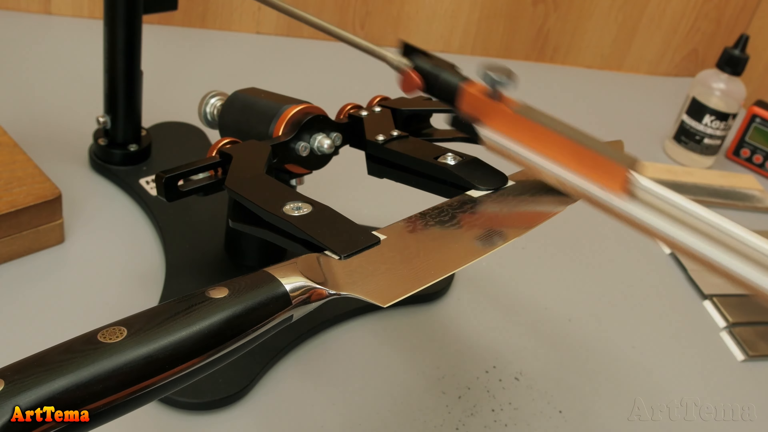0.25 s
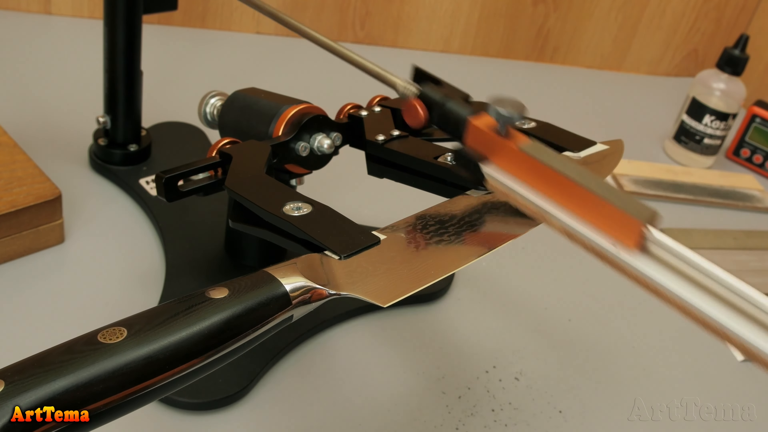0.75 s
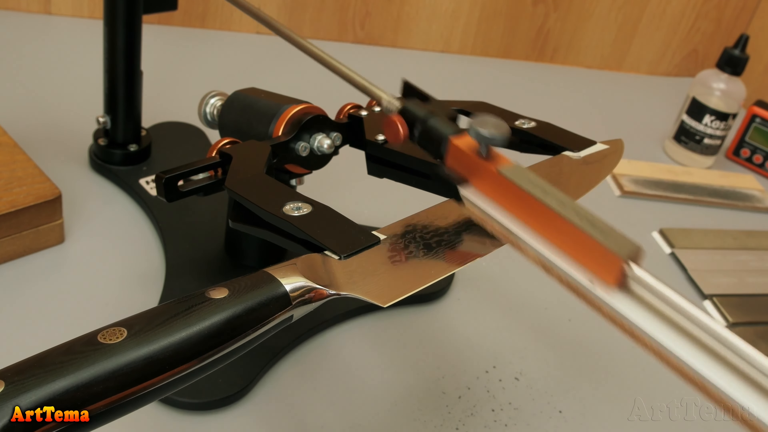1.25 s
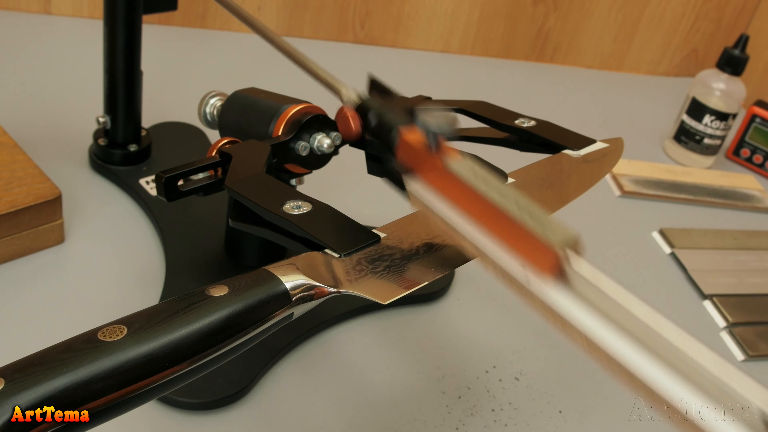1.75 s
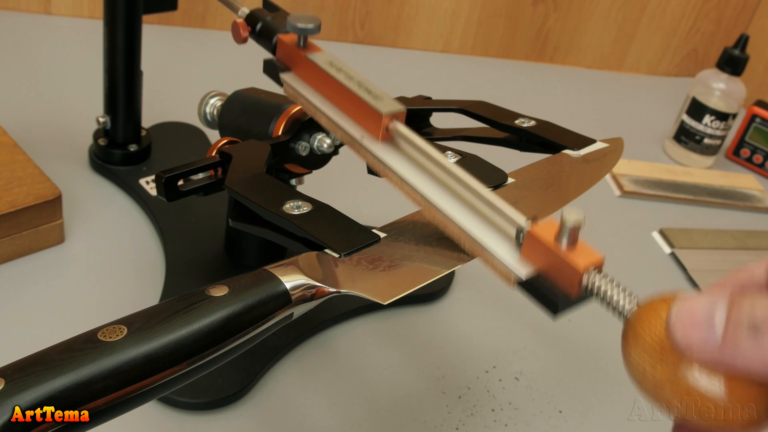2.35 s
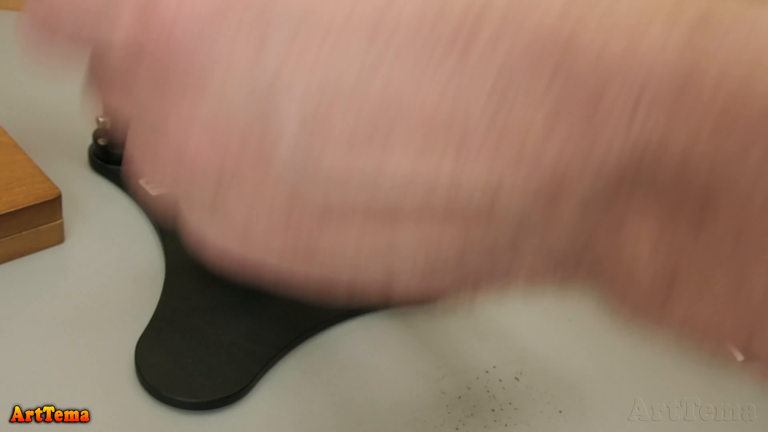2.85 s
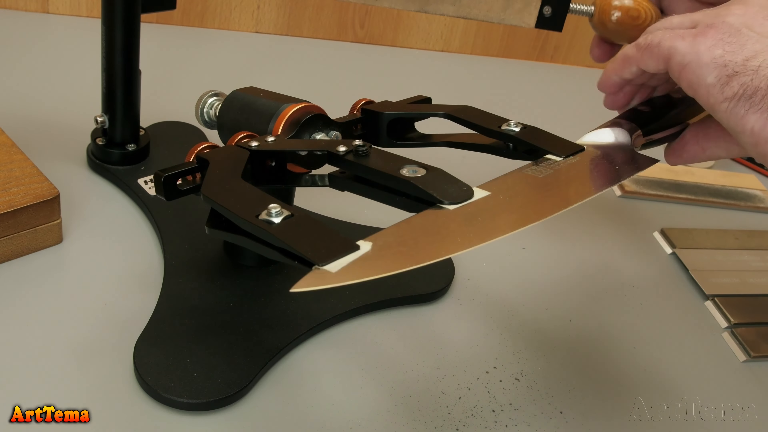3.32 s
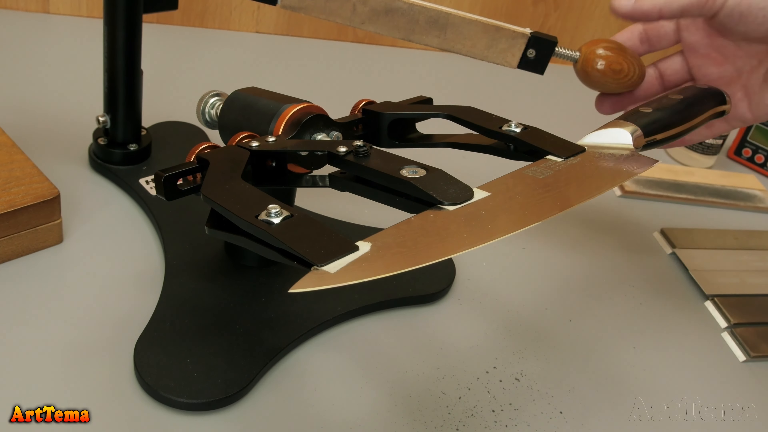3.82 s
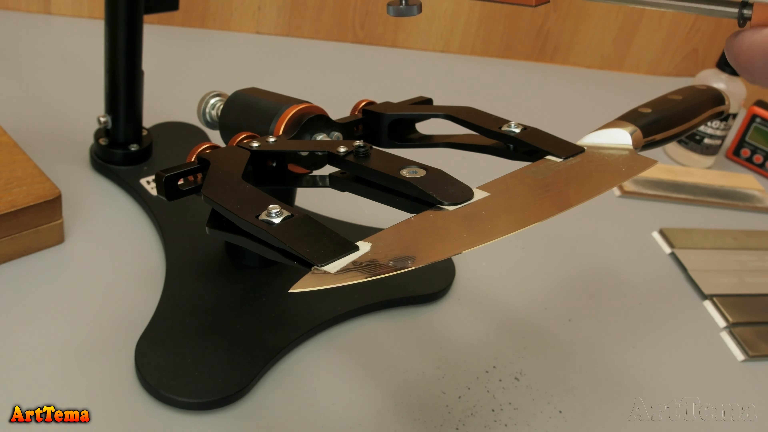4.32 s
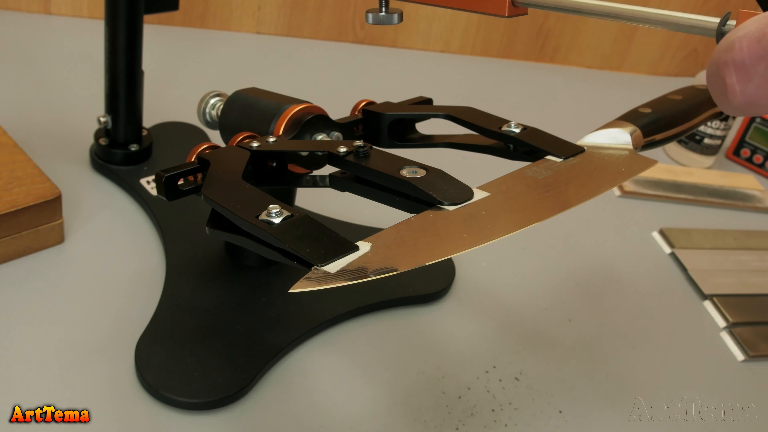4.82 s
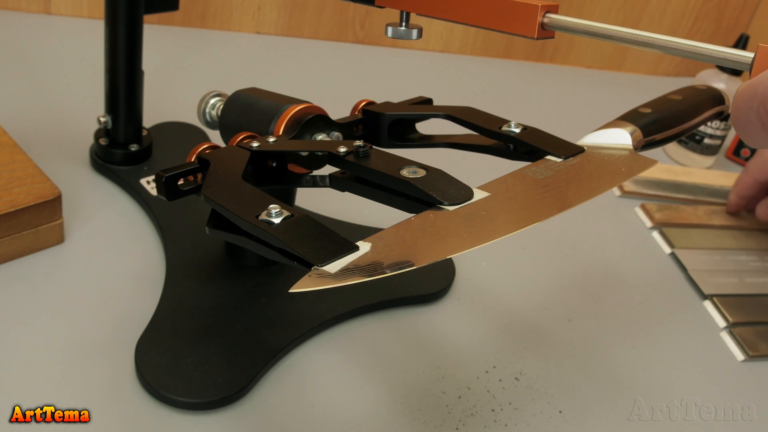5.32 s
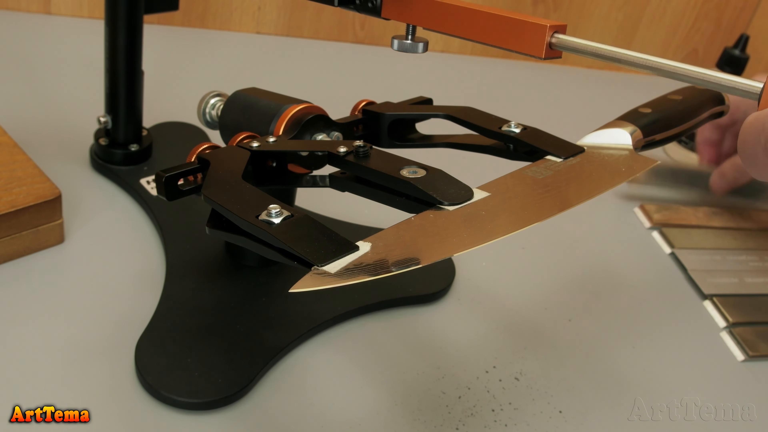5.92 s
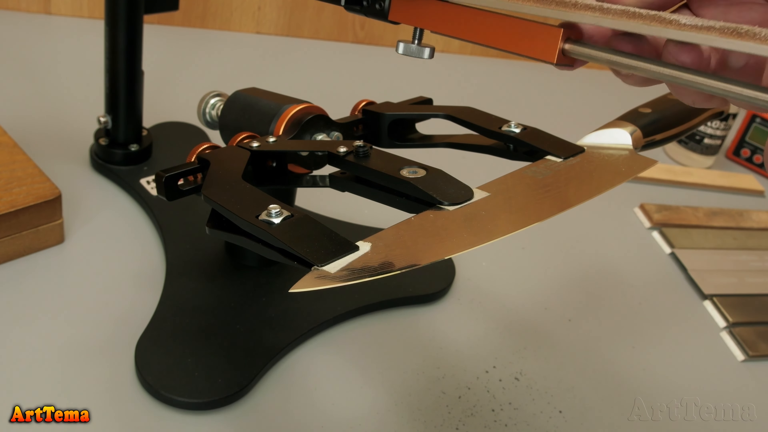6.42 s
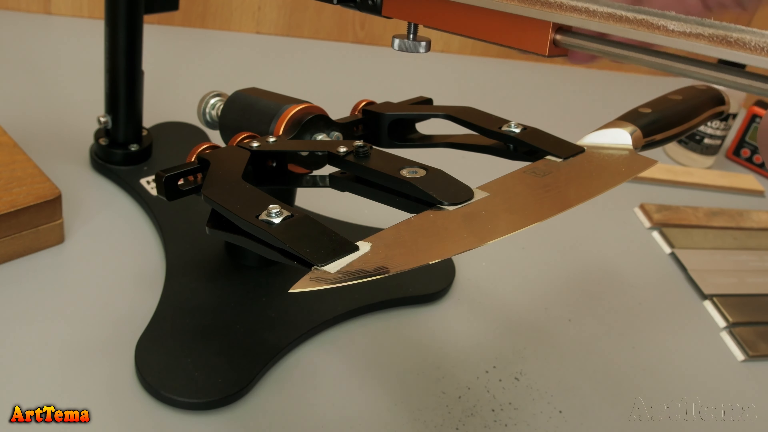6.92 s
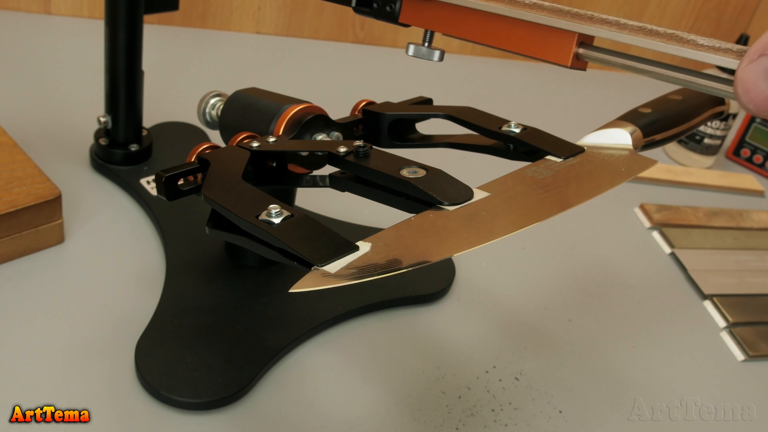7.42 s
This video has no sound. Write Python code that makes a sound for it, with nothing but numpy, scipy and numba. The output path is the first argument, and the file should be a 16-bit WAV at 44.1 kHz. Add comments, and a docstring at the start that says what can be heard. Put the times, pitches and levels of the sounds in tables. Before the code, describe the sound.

On a bench in a small quiet room, a stone on a guide rod strokes a clamped knife, dull pulls alternating with brighter, hissing pushes, each turn softly thumping the bench. Near three seconds it stops; the clamp flips over with a heavy double thud. Small clinks and slides follow, then loud sharp clacks as the stone is swapped, and a few lighter knocks. Close stereo microphone on the bench, faint room air.

```python
"""On a bench in a small quiet room, a stone on a guide rod is stroked to and fro along a clamped knife.
Grit makes the hiss; each turn of the rod thumps the bench, which rings at its own low pitches.
Then the clamp is flipped over and the stone is swapped: bursts of tiny contacts make clacks and slides.
A close stereo microphone on the same bench hears it through gain control, over faint room air."""
import sys
import numpy as np
from scipy import signal
from scipy.fft import rfft, irfft, next_fast_len
from scipy.io import wavfile
from scipy.ndimage import uniform_filter1d
from numba import njit

SR = 44100
rng = np.random.default_rng(int(sys.argv[2]) if len(sys.argv) > 2 else 0)


def inscribe(sig):
    """Save sig as 16-bit PCM at rate SR to the path in sys.argv[1].

    A 1-D sig is mono; a 2-D sig holds one channel per row.
    Samples are clipped to [-1, 1] before scaling.
    """
    pcm = np.round(np.clip(np.atleast_2d(sig).T, -1, 1) * 32767)
    wavfile.write(sys.argv[1], SR, pcm.astype(np.int16))


N = 338247  # length of the scene [samples]

# "Ring time" and "fade time" are the time to drop by 60 dB. Levels are set ahead of the gain control.
# Room air and microphone hiss: (frequency [Hz], loudness against the other rows [dB])
AIR_COLOUR = [(15, -36.5), (25, -10), (141, 2), (624, -13.5), (911, -21), (1100, -47.5), (1840, -27.5),
              (2990, -31), (3340, -32), (4610, -38), (6210, -39), (12200, -41), (16000, -43)]
# The stone on the blade, a dull pull and a bright push by turns: (fastest moment [s],
#   speeding up [s], slowing down [s], hiss gain [dB], treble gain [dB], drag felt in the bench, gain [dB])
STONE_STROKES = [(.02, .12, 0.15, -75, -75, -72), (.37, 0.16, 0.091, -61, -55, -52.5),
                 (.55, 0.15, .14, -70.5, -74.5, -57), (.81, 0.11, 0.12, -66, -57.5, -53.5),
                 (1.02, 0.072, 0.13, -68, -73, -85), (1.3, 0.13, 0.13, -62.5, -55.5, -52.5),
                 (1.5, 0.084, 0.14, -68, -74, -75), (1.769, .14, 0.072, -59.5, -53.5, -58),
                 (1.92, 0.087, 0.13, -70, -78, -79), (2.17, .1, .12, -58.5, -53.5, -54.5),
                 (2.36, 0.076, 0.13, -70, -81, -75), (2.58, 0.15, 0.087, -69.5, -60, -53),
                 (2.81, 0.092, 0.15, -71, -83, -65)]
# Faint rubbing of rod and hands throughout: (time [s], hiss gain [dB], treble gain [dB],
#   drag felt in the bench, gain [dB], shake of the stand, gain [dB])
FAINT_HANDLING = [(0, -80, -86.5, -65.5, -70.5), (2.9, -79.5, -82.5, -68.5, -73),
                  (3.14, -75, -79.5, -59, -56.5), (3.32, -72, -79, -62, -71), (3.48, -68, -68.5, -48, -64),
                  (3.65, -65, -75, -72, -68), (3.83, -75, -80, -65.5, -66.5),
                  (4.85, -74.5, -79.5, -63.5, -78.5), (5.3, -74.5, -80.5, -68.5, -75),
                  (5.44, -77.5, -87, -79.5, -80.5), (5.68, -88, -86, -74, -80.5),
                  (5.8, -74.5, -78, -71, -70), (6.01, -69.5, -65.5, -64.5, -69.5),
                  (6.4, -76, -81, -65.5, -76.5), (6.62, -65.5, -73.5, -64, -67.5),
                  (6.89, -77.5, -77, -68, -77), (7.67, -76.5, -81.5, -63, -78)]
# Pitches of the bench top: (frequency [Hz], level [dB], ring time when left free [s])
BENCH_MODES = [(36, -19, 0.14), (70, -6, 0.16), (103, -10.5, 0.19), (125.8, 4.5, .12), (158, -3, 0.13),
               (198, 2.5, .07), (271.6, -0.5, 0.15), (326, -2, 0.14), (384.4, 0.5, 0.13), (545, -14, 0.091),
               (578.6, -12.5, 0.14), (709.6, -12, 0.24), (850, -48.5, .05), (1400, -29.5, .04)]
# Pitches of rod, stone holder and blade: (frequency [Hz], level [dB], ring time when left free [s])
STEEL_MODES = [(1561, -2.5, 0.022), (1950, 6, 0.017), (2290, 6, 0.013), (2810, 7.5, 0.01),
               (3401, 7.5, 0.03), (3614, 1.5, 0.058), (3940, -2, 0.037), (4200, -5.5, 0.015),
               (4780, -1, .04), (4990, -1.5, 0.06), (5660, 2, 0.022), (6340, 0.5, 0.045), (6850, -5.5, .04),
               (6660, -10.5, 0.027), (8800, -12, .03), (10710, -7.5, .03)]
# Blows into the bench: (time [s], level of the low boom [dB], length of the push [ms],
#   knock of the first touch against the boom [dB], size of the rebound [share of the push])
BENCH_BLOWS = [(.075, -49, 5.7, -33, 0.57), (.202, -24.5, 1.7, -31, .99), (.427, -5, 2.2, -17.5, 0.45),
               (.669, -26, 4.8, -15.5, 1), (.849, -42.5, 1.3, -30, 0.69), (.923, -44.5, 4.8, -33, 0.87),
               (1.169, -22, 1.3, -22, 0.88), (1.358, -26.5, 4.8, -22, 0.89), (1.588, -28, 3.3, -36, .96),
               (1.657, -40, 5.6, -27, 0.62), (2.054, -21, 1.3, -20, 0.75), (2.282, -47, 2.7, -18, 1),
               (2.473, -24.5, 3.8, -8, 0.57), (2.59, -41.5, 4.5, -16, .9), (2.803, -38, 4.9, -33, .99),
               (2.878, -43, 6.1, -23, 0.74), (2.988, -41.5, 4.9, -31, 0.9), (3.095, -23, 3.8, -11.5, 0.86),
               (3.359, -13.5, 2.6, -8.5, 0.94), (3.37, -8.5, 2.5, -16, .99), (3.508, -30.5, 7.3, -38, 0.47),
               (3.55, -25.5, 5.4, -18, 0.92), (3.982, -46, 3.1, -8.5, .99), (4.096, -49.5, 5.8, -13, .9),
               (4.289, -47.5, 6.8, -16, 0.87), (4.398, -42, 4.8, -34, .96), (4.67, -45, 5.4, -6.5, .99),
               (5.24, -21.5, 5.5, 10, .41), (5.306, -23.5, 4, 15, 0.38), (5.712, -33.5, 1.6, -21.5, .46),
               (5.729, -40.5, 1.6, -21, 0.89), (5.974, -33, 8.3, -6, .67), (6.405, -39.5, 4.3, -4.5, 0.85),
               (6.724, -38.5, 4.3, 12.5, 0.63)]
# The rod ticks on its stop, the clamp seats, stone bars knock on wood and metal:
#   (time [s], level ahead of a shared 10.5 dB cut [dB], centre [Hz], knock under it [dB],
#   treble [dB], ring pitch [Hz], ring level [dB], fade time [s])
KNOCK_EVENTS = [(0.198, -53.5, 1890, 16, -19, 1920, -3.5, 0.034),
                (.4284, -39.5, 1230, 19.5, -26, 4560, -12.5, 0.12),
                (1.1706, -59, 1950, 22, -21, 1970, 5, 0.045), (2.053, -58.5, 1500, 25, -16, 1590, -8, .051),
                (2.4774, -56, 2020, 14.5, -14, 2020, -3, 0.28), (3.048, -62, 1050, 8, -25, 1560, -17, .04),
                (3.095, -41.5, 1270, 16, -13, 5300, 1.5, 0.06),
                (3.19, -61, 1050, 10, -25, 1560, -15, 0.043),
                (3.3591, -22.5, 3070, 4, -47, 2870, -25, 0.057),
                (3.3784, -32, 1230, 8, -8, 3360, -12, .078), (3.5492, -39, 2100, 1.5, -40, 2100, -15, 0.1),
                (5.1951, -9.5, 4020, 0.6, -18, 1600, -4.5, 0.041),
                (5.244, -14, 1920, -1.5, -29.5, 3530, -16.5, 0.069),
                (5.3146, 5, 3170, -14.5, -27.5, 2410, -17.5, 0.034),
                (5.3416, -4.5, 3350, -7, -27.5, 2560, -19, .06),
                (5.4882, -29, 2950, -22, -13.5, 3860, 11.5, 0.013),
                (5.9809, -4, 1860, 0.1, -28.5, 3380, -22, .05),
                (6.7268, -8, 5450, -30, -2.5, 5400, -14.5, 0.046)]
# Loose steel parts clink: (time [s], level ahead of a shared 10.5 dB cut [dB], centre [Hz],
#   knock under it [dB], treble [dB], ring pitch [Hz], ring level [dB], fade time [s])
CLINK_EVENTS = [(3.7106, -22.5, 2340, -11, -50, 3800, -19, 0.096),
                (3.7825, -35.5, 4960, -8, -16, 2060, -10, 0.092),
                (4.465, -57, 6200, 6.5, -1, 6150, -5, .045),
                (4.7136, -31, 3580, -40, -23.5, 2150, -9, 0.081),
                (4.805, -27.5, 3830, -36, -16.5, 2290, -13.5, .053),
                (5.309, -3, 1647, -8, -32, 3215, -12, .09), (6.4051, -20.5, 4780, -26, -23, 3020, -7, .034),
                (6.4536, -21.5, 4870, -29, -34.5, 2630, -4, 0.022),
                (6.4803, -16.5, 5830, -18, -11.5, 2840, -9, .048),
                (6.6132, -34.5, 4030, -18.5, -13.5, 2600, -6.5, .049),
                (7.3294, -64.5, 2190, -5, 9.5, 2205, -6, 0.068),
                (7.43, -40.5, 5980, -13, -3, 5940, -8, 0.058)]
# Short scrapes and slides: (time [s], level ahead of a shared 10.5 dB cut [dB], centre [Hz],
#   knock under it [dB], treble [dB], ring pitch [Hz], ring level [dB], fade time [s], length [s])
SLIDE_EVENTS = [(3.1292, -57, 3900, 21.5, -25, 3900, -4, .074, 0.015),
                (3.2487, -61.5, 5460, -17, -21, 6000, -.6, .093, 0.023),
                (3.458, -62.5, 6000, -6, -21, 6450, 6, .11, 0.025),
                (3.606, -45.5, 2280, -7, -11.5, 3710, -26, .09, 0.032),
                (3.7289, -39, 1960, -4, -3.5, 3780, -5, .27, 0.0066),
                (4.1496, -58.5, 6260, 5.5, -17, 2540, 0, .19, 0.048),
                (4.2801, -52, 1910, -2.5, -11, 3310, -23, .13, .044),
                (4.6754, -48, 3350, -26, -25, 3440, 1.5, .11, 0.031),
                (4.6892, -37, 3450, -36, -35, 2100, -7, .1, 0.025),
                (4.7388, -40.5, 3430, -26, -27, 2250, -6, .13, 0.0047),
                (4.8286, -55.5, 3700, -9, -17, 3580, -3, .1, 0.012),
                (4.8974, -61, 3440, -11, -21, 3440, 2, 0.076, 0.012),
                (5.2089, -25.5, 4020, 1.5, -22, 3000, -4, 0.23, .029),
                (5.3257, -21.5, 4200, 3.5, -23, 2950, -4.5, 0.11, 0.017),
                (5.6231, -44, 1900, 9, 0, 5880, -4, 0.093, 0.0098),
                (5.8313, -52.5, 3450, 15, 1, 1833, -17, 0.07, 0.011),
                (5.9993, -31.5, 1580, 8, -41, 3260, -15, .16, 0.0084),
                (6.0392, -48.5, 2900, 9, 0, 3530, -15, 0.32, 0.022),
                (6.1284, -53, 1900, -.6, -17, 4750, -16, .11, .022),
                (6.4193, -33.5, 4740, -7, -17, 2960, 0, 0.11, .019),
                (6.4482, -26.5, 4640, -4.5, -22, 2520, -15, 0.17, 0.0079),
                (6.5195, -38, 4100, -37, -21, 5400, -7, 0.085, 0.0084),
                (6.5594, -56.5, 5400, -22, -26, 3700, -8, .14, 0.027),
                (6.6596, -63.5, 3750, 10, -13, 1580, 2, .11, 0.02),
                (6.8287, -64.5, 3450, -12, -16, 3480, -5, .09, 0.018),
                (6.8889, -42, 2710, -8, -9, 3890, -12, 0.065, 0.014),
                (7.4087, -48.5, 2250, -11, -12, 6160, -9, .13, 0.037)]
# How each contact touches: (rise [s], share of the free ring left, ring at the centre [dB],
#   left minus right [dB]); a gripping hand shortens the ring
KNOCK_TOUCH = (0.0045, 0.15, -17.5, -3.5)
CLINK_TOUCH = (0.0134, 0.56, -8, -4)
SLIDE_TOUCH = (0.0228, 0.36, -10, -4)
KNOCK_RATTLE_S, CLINK_RATTLE_S = 0.00096, 0.0019

AIR_DB = -61
FALL_DB, FALL_POWER = 27.5, 1.48  # how far and how soon a stroke fades away from its fastest moment
SHAKE_DB = 1.5  # shake of the stand against the hiss of a stroke
PULL_RING_DB = -1  # the light pull lets two steel modes sing out, against its hiss
THUMP_RING, SOFT_DAMP = 0.99, 0.04  # share of free ring left; loss per ms, as a soft hand rests longer
REBOUND_S = 0.0082  # wait between push and rebound
BENCH_PAN_DB, RUB_PAN_DB = -2, -1.5  # left minus right; the low sounds of rubbing get both
NEAR_WALL_DB, NEAR_WALL_T60_S, NEAR_WALL_WIDTH_HZ = -5, 0.02, 8000
ROOM_DB, ROOM_T60_S, ROOM_WIDTH_HZ = -27.5, 0.17, 4000
PORT_LAG_MS, PORT_TURN_MAX = 0.026, 1.4  # delay of the left port; its largest phase turn [radians]
TOP_HZ = 15900  # the treble is cut above this


def undb(db):
    """Turn decibels into a plain factor."""
    return 10 ** (np.asarray(db) / 20)


def level(x, db):
    """Scale a sound to a given average (rms) level."""
    return x * undb(db) / np.sqrt(np.mean(x ** 2))


def through(x, response):
    """Filter by a response given as a function of frequency."""
    size = next_fast_len(x.shape[-1] + SR // 8)
    hz = np.arange(size // 2 + 1) * SR / size + 1e-3
    return irfft(rfft(x, size) * response(hz), size)[..., :x.shape[-1]]


def band(hz, centre_hz, width_hz):
    """One resonance, gain 1 at the centre."""
    return 1j * hz * width_hz / (centre_hz ** 2 - hz ** 2 + 1j * hz * width_hz)


def cut_lows(hz, corner_hz):
    """Gently weaken what lies below the corner."""
    return 1j * hz / (corner_hz + 1j * hz)


def cut_highs(hz, corner_hz):
    """Gently weaken what lies above the corner."""
    return 1 / (1 + 1j * hz / corner_hz)


def modes(hz, table, gains, ring=1):
    """Sum of ringing pitches; a blow starts each at its table level times its gain."""
    total = 0
    for gain, (mode_hz, db, t60) in zip(gains, table):
        ring_s = t60 * ring
        width_hz = np.log(1000) / (np.pi * ring_s)
        total = total + gain * undb(db) * ring_s * band(hz, mode_hz, width_hz)
    return total


def grit(count, rough_db):
    """Dense tiny contacts whose sizes scatter widely."""
    size_db = rough_db * np.minimum(rng.exponential(size=count), 3)
    return level(rng.standard_normal(count) * undb(size_db), 0)


def walk(rate):
    """Random values, rate new ones a second, with smooth slides between; spread near 1."""
    k = int(SR / rate)
    steps = np.repeat(rng.standard_normal(N // k + 1), k)
    return np.sqrt(3 / 2) * uniform_filter1d(steps, k)[:N]


def pan(db):
    """Left and right factors for a level difference, left minus right."""
    return undb(np.array([[db], [-db]]) / 2)


def add(out, sound, s, pan_db):
    """Lay a sound into the stereo track at a time in seconds."""
    i = int(s * SR)
    out[:, i:i + len(sound)] += sound[:N - i] * pan(pan_db)


def air():
    """Room tone and microphone hiss: noise of its own in each ear, plus some shared bass."""
    f, db = np.transpose(AIR_COLOUR)
    colour = lambda hz: undb(np.interp(np.log(hz), np.log(f), db))
    own, shared = rng.standard_normal((2, N)), rng.standard_normal(N)
    bass = through(shared, lambda hz: 0.35 * band(hz, 130, 290))
    return level(through(own + bass, colour), AIR_DB)


def strokes(column, rows=STONE_STROKES):
    """Gain of one column of the strokes: loudest where the hand is fastest."""
    t, out = np.arange(N) / SR, np.zeros(N)
    for row in rows:
        s, up, down = row[:3]
        way = np.where(t < s, (s - t) / up, (t - s) / down)
        out += undb(row[column] - FALL_DB * np.minimum(way, 4) ** FALL_POWER)
    return out


def wander(x, table, spread_db, rate, tilt_db=0, ring=1):
    """Rubbing rings each mode by turns as the point of contact travels; tilt per octave."""
    total = 0
    for f, db, t60 in table:
        gain = undb(db + tilt_db * np.log2(f) + spread_db * walk(rate)) * np.sqrt(t60)
        sharpness = f * t60 * ring * np.pi / np.log(1000)
        total = total + gain * signal.lfilter(*signal.iirpeak(f, sharpness, SR), x)
    return total


def rubbing():
    """Grit under the stone hisses, rings the steel and drags on stand and bench."""
    s, *columns = np.transpose(FAINT_HANDLING)
    faint = [undb(np.interp(np.arange(N) / SR, s, c)) for c in columns]
    hissing, bright, dragging = (faint[k] + strokes(column=3 + k) for k in range(3))
    pulling = strokes(column=3, rows=STONE_STROKES[::2])  # every other stroke is a pull
    shaking = faint[3] + undb(SHAKE_DB) * (hissing - faint[0])
    out = np.zeros((2, N))
    dark = lambda hz: 1 / (1 + (1500 / hz) ** 4)  # thin steel sends out little below this
    for side in out:
        # stone and rod are long, so each port hears its own mix of the hiss
        hiss = level(through(grit(N, 1.5), lambda hz: band(hz, 3600, 1800) ** 2 * dark(hz)), -6.5)
        # the stone damps the steel, so its ring is shortened
        ring = level(wander(grit(N, 1.5), STEEL_MODES[:10], 5.5, 14, ring=.7), 0)
        treble = level(through(grit(N, 1.3), lambda hz: band(hz, 6300, 13000) ** 2 * dark(hz)), 0)
        zing = level(wander(grit(N, 1.5), STEEL_MODES[10:], 5.0, 14, ring=.45), -2)
        sing = wander(grit(N, 1.5), STEEL_MODES[4:9:4], 6.5, 15, tilt_db=3.5, ring=.35)
        sing = level(sing, PULL_RING_DB)
        patchy = undb(2.5 * walk(45))
        side += patchy * (hissing * (hiss + ring) + bright * (treble + zing) + pulling * sing)
    drag = level(wander(grit(N, 3.2), BENCH_MODES[:7], 8.0, 8.3, ring=.7), 0)
    shake = level(wander(grit(N, 2.6), BENCH_MODES[6:13], 5.8, 10, tilt_db=7.5, ring=.55), 0)
    low = undb(2.5 * walk(30)) * dragging * drag
    low += undb(0.85 * walk(30)) * shaking * shake
    add(out, low, 0, BENCH_PAN_DB)
    return out * pan(RUB_PAN_DB)


def thumps():
    """A soft push and its rebound ring the low bench modes; the first touch knocks the upper ones."""
    out, t = np.zeros((2, N)), np.arange(SR // 3) / SR
    for s, boom_db, push_ms, knock_db, rebound in BENCH_BLOWS:
        gains = undb(2 * rng.standard_normal(len(BENCH_MODES)))  # each blow rings the modes a bit differently
        ring = THUMP_RING - SOFT_DAMP * push_ms
        half_sine = lambda late: np.sin(np.pi * np.clip((t - late) * 1000 / push_ms, 0, 1))
        push = half_sine(0) + rebound * half_sine(REBOUND_S)
        touch = rng.standard_normal(len(t)) * t * np.exp(-t / 0.0034)
        # the stand rocks on its feet near 83 Hz
        rocking = lambda hz: modes(hz, BENCH_MODES, gains, ring) * band(hz, 83, 110)
        upper = lambda hz: (modes(hz, BENCH_MODES, gains, 0.84 * ring)
                            * cut_lows(hz, 200) ** 3 * cut_highs(hz, 700) ** 2)
        low, knock = through(push, rocking), through(touch, upper)
        sound = low / np.abs(low).max() + undb(knock_db) * knock / np.abs(knock).max()
        add(out, -sound * undb(boom_db), s, BENCH_PAN_DB)
    return out


def clacks():
    """A rattle of tiny contacts, then a fade: it sounds bare, rings the steel and knocks the stand."""
    out, t = np.zeros((2, N)), np.arange(SR // 5) / SR
    flat = np.ones(len(STEEL_MODES))
    contacts = [tuple(row) + (KNOCK_RATTLE_S,) + KNOCK_TOUCH for row in KNOCK_EVENTS]
    contacts += [tuple(row) + (CLINK_RATTLE_S,) + CLINK_TOUCH for row in CLINK_EVENTS]
    contacts += [tuple(row) + SLIDE_TOUCH for row in SLIDE_EVENTS]
    for (s, level_db, centre_hz, knock_db, treble_db, ring_hz, ring_db, t60,
         rattle, rise, ring, centre_db, pan_db) in contacts:
        fade_db = -60 * np.clip(t - rise - rattle, 0, None) / t60
        hits = grit(len(t), 2.5) * np.clip(t / rise, 0, 1) ** 2 * undb(fade_db)
        steel = lambda hz: modes(hz, STEEL_MODES, flat, ring)
        bare = lambda hz: (band(hz, centre_hz, 1.166 * centre_hz) ** 2
                           * cut_lows(hz, 900) * cut_highs(hz, 4.5 * centre_hz))
        ring_at_centre = lambda hz: steel(hz) * band(hz, centre_hz, 0.082 * centre_hz) ** 2
        ring_at_pitch = lambda hz: steel(hz) * band(hz, ring_hz, .2 * ring_hz) ** 2
        treble = lambda hz: band(hz, 9000, 8100) ** 2
        knock = lambda hz: band(hz, 320, 640) ** 2 * cut_highs(hz, 1100)
        parts = [(0, bare), (centre_db, ring_at_centre), (ring_db, ring_at_pitch),
                 (treble_db, treble), (knock_db, knock)]
        sound = 0
        for db, response in parts:
            part = through(hits, response)
            loudest = np.sqrt(uniform_filter1d(part ** 2, size=150).max())  # over about 3 ms
            sound = sound + undb(db - 10.5) * part / loudest
        add(out, undb(level_db) * sound, s - .7 * rise, pan_db)
    return out


def echoes(x, db, t60, width_hz):
    """A fading cloud of reflections, different at each port."""
    t = np.arange(int(.4 * SR)) / SR
    tail = rng.standard_normal((2, len(t))) * undb(-60 * t / t60) * (t > .0015)
    tail = through(tail, lambda hz: band(hz, 3600, width_hz))
    tail *= undb(db) / np.sqrt(np.sum(tail[0] ** 2))
    return signal.oaconvolve(x.mean(axis=0, keepdims=True), tail, axes=1)[:, :N]


def scene():
    """Air, rubbing, thumps and clacks together; only the clacks get echoes."""
    background = air() + rubbing()
    hits = clacks()
    near = thumps() + hits
    near += echoes(hits, NEAR_WALL_DB, NEAR_WALL_T60_S, NEAR_WALL_WIDTH_HZ)
    near += echoes(hits, ROOM_DB, ROOM_T60_S, ROOM_WIDTH_HZ)
    # the work lies to the right: the left port lags, up to a fixed turn of phase in the treble
    turn = lambda hz: np.minimum(2 * np.pi * hz * PORT_LAG_MS / 1000, PORT_TURN_MAX)
    near[0] = through(near[0], lambda hz: np.exp(-1j * turn(hz)))
    return background + near


@njit
def follow(x, attack, release):
    """Smoothed loudness that rises faster than it falls."""
    e, out = 0., np.empty(len(x))
    for i in range(len(x)):
        e += (x[i] - e) * (attack if x[i] > e else release)
        out[i] = e
    return out


def record(dry):
    """The bench's reflection weakens a band; gain control turns loud clatter down; the top is cut."""
    dry = through(dry, lambda hz: 1 - 0.57 * band(hz, 1146, 500))
    # the gain control hardly hears the bass
    heard = np.abs(through(dry.mean(axis=0), lambda hz: cut_lows(hz, 700)))
    envelope = follow(heard, 1 / (0.086 * SR), 1 / (.15 * SR))  # rise and fall times [s]
    gain = (1 + envelope / undb(-39.0)) ** -.6
    top_cut = signal.ellip(10, .2, 80, TOP_HZ, fs=SR, output="sos")
    return signal.sosfilt(top_cut, dry * gain)


dry = scene()
out = record(dry)
inscribe(out)
```